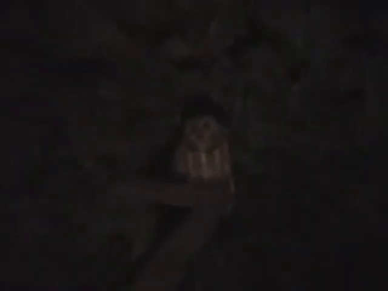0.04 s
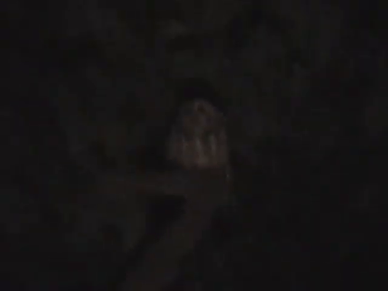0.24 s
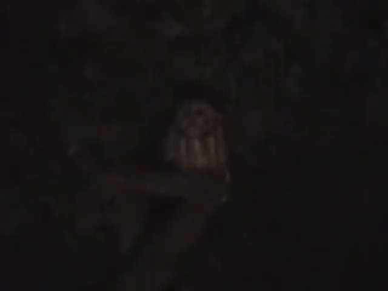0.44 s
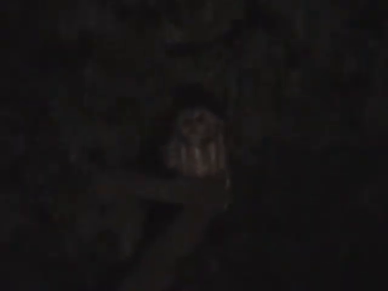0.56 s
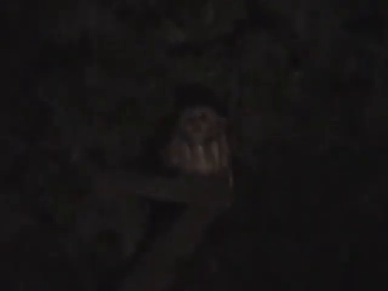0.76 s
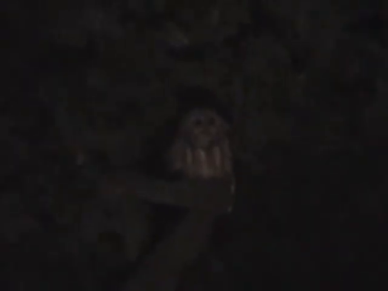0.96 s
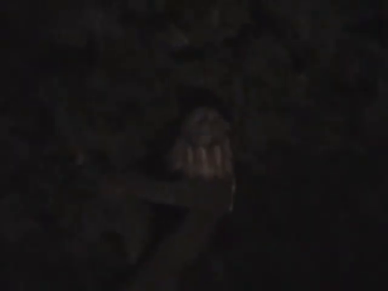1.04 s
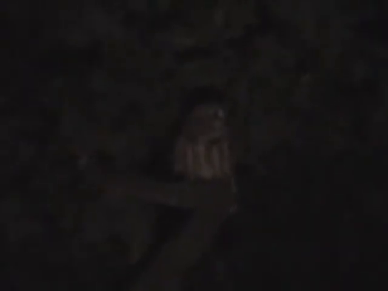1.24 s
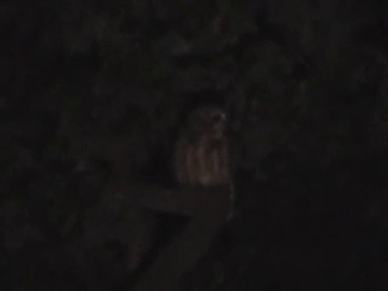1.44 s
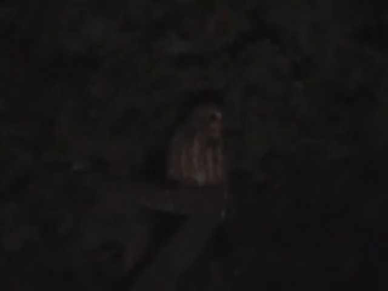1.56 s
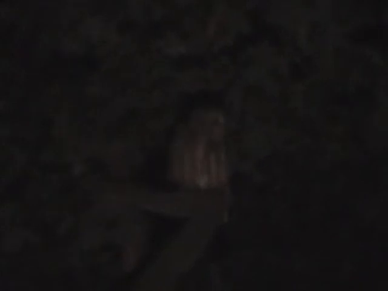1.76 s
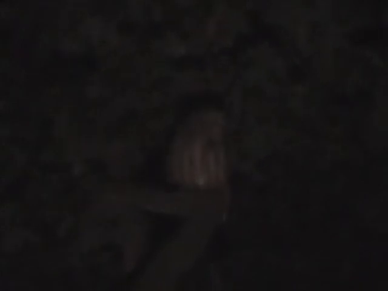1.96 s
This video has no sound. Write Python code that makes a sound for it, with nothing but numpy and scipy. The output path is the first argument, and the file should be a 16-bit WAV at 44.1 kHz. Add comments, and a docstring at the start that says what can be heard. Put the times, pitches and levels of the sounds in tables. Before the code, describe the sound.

An owl gives one loud, shrieking call at night, echoing slightly over faint hiss.

```python
"""Among trees at night, an owl on a perch gives one two-part call: a soft falling note, then a loud
arched shriek, its harmonics gliding through the fixed resonances of throat and beak. Ground and trunks
throw back a few echoes and a short tail. A small hollow knock follows close by, after a much fainter one,
and later a tiny rustle. Under it all lie faint night air and the hiss and ticking of a camera."""
import sys
import numpy as np
from scipy import signal
from scipy.fft import rfft, irfft, next_fast_len
from scipy.io import wavfile

SR = 44100
rng = np.random.default_rng(int(sys.argv[2]) if len(sys.argv) > 2 else 0)


def to_wav(sig):
    """Store sig (one row per channel, or 1-D mono) as 16-bit WAV at the path in sys.argv[1].

    Samples outside -1..1 are clipped; the rate is SR.
    """
    pcm = np.clip(np.atleast_2d(sig), -1, 1) * 32767
    pcm = np.round(pcm).astype(np.int16)
    wavfile.write(sys.argv[1], SR, pcm.T)  # frames by channels


N = 88200
LEAD = SR // 10  # samples of pre-roll: the call is already under way at time zero
TIME = np.arange(-LEAD, N) / SR
SIZE = len(TIME)
BINS_HZ = np.maximum(np.fft.rfftfreq(SIZE, 1 / SR), 1)


def from_db(db):
    """Decibels to gain."""
    return 10 ** (np.asarray(db) / 20)


def rms_one(x):
    """Scale to unit rms."""
    return x / np.sqrt(np.mean(x ** 2) + 1e-20)


def at_hz(curve, hz):
    """Read a curve on a log-frequency axis."""
    points_hz, values = np.transpose(curve)
    return np.interp(np.log(hz), np.log(points_hz), values)


def drift(hz):
    """Random wander up to the given rate, at unit rms."""
    lowpass = signal.butter(2, hz, fs=SR, output="sos")
    return rms_one(signal.sosfilt(lowpass, rng.standard_normal(SIZE + SR))[SR:])


def delayed(x, s):
    """The sound, s seconds later."""
    size = next_fast_len(len(x) + SR)
    shift = np.exp(-2j * np.pi * np.fft.rfftfreq(size, 1 / SR) * s)
    return irfft(rfft(x, size) * shift, size)[:len(x)]


def panned(x, pan_db, left_lag_s=0):
    """Mono to stereo by level and arrival time; a positive pan leans left."""
    return np.array([from_db(pan_db / 2) * delayed(x, left_lag_s), from_db(-pan_db / 2) * x])


def stereo(mid, side, correlation):
    """Blend two independent noises into a left-right pair of the given correlation."""
    return (np.sqrt(1 + correlation) * mid + np.sqrt(1 - correlation) * side * [[1], [-1]]) / np.sqrt(2)


def stereo_noise(size, correlation):
    """White noise, wider as the correlation drops."""
    return stereo(*rng.standard_normal((2, size)), correlation)


# Tone of the air and hiss. Each row: frequency in Hz, relative noise density in dB.
AIR_TONE = [(20, -21), (32, -26), (50, 0), (80, -3), (115, -8), (140, 0), (170, -10.5), (215, -0.5),
            (290, -10.5), (400, -3), (520, -5), (590, -10), (680, -7), (790, -8), (900, -12.5), (1030, -18),
            (1200, -13), (1400, -11.5), (2400, -15), (3400, -18.5), (3900, -17), (4750, -22), (5800, -21.5),
            (7500, -23), (9500, -24.5), (11200, -25), (13000, -24), (15500, -33.5)]
# Stereo image of that bed. Each row: frequency in Hz, left-right correlation.
AIR_CORRELATION = [(40, 0.93), (100, 0.66), (200, -0.12), (400, -0.27), (700, 0.005), (1500, -0.16),
                   (6000, 0.16), (10500, 0.283), (14000, 0.72)]
# Humming bands in the bed. Each row: centre in Hz, half-width in Hz, level in dB.
HUM_BANDS = [(1050, 37, -70.5), (656, 35, -72.5), (10920, 670, -77), (3850, 80, -85)]


def night_air():
    """A steady bed of distant rush and hiss, with a few narrow bands of humming noise."""
    mid, side = rfft(rng.standard_normal((2, SIZE)))
    spectrum = from_db(at_hz(AIR_TONE, BINS_HZ)) * stereo(mid, side, at_hz(AIR_CORRELATION, BINS_HZ))
    bed = from_db(-59.5) * rms_one(irfft(spectrum, SIZE))
    for centre, half_width, db in HUM_BANDS:
        band = rfft(stereo_noise(SIZE, correlation=.25)) / (1 + ((BINS_HZ - centre) / half_width) ** 2)
        bed += from_db(db) * rms_one(irfft(band, SIZE))
    return bed


# The call as heard through the trees, with level dips where reflections interfere. Each row: time in
# seconds, pitch in Hz, then levels in dB of the fundamental, second harmonic and overtones, before EQ.
CALL_THROUGH_TREES = [(-.06, 1403, -59, -46.5, -58.5), (-.003, 1359, -45, -46, -47),
                      (0.017, 1241, -64, -46.5, -64), (0.029, 1180, -58, -58.5, -53.5),
                      (.064, 1121, -54, -43.5, -63.5), (.078, 1019, -59, -56, -52.5),
                      (0.113, 1025, -56.5, -55.5, -48.5), (0.14, 965.6, -61.5, -61.5, -53.5),
                      (.166, 1004, -53, -55.5, -40.5), (0.183, 1134, -50.5, -42, -38.5),
                      (.2, 1110, -53, -44.5, -40), (0.211, 1252, -59, -37.5, -36.5),
                      (0.227, 1404, -48.5, -37, -37), (.258, 1546, -52, -31.5, -39.5),
                      (.276, 1648, -47.5, -31, -34.5), (.298, 1626, -47.5, -27, -32),
                      (.312, 1642, -38, -44.5, -32.5), (.325, 1617, -43, -30, -39),
                      (.333, 1613, -45, -39.5, -35), (.343, 1606, -45, -26, -34),
                      (0.361, 1473, -47, -32, -37), (0.375, 1382, -51, -32, -38.5),
                      (0.384, 1127, -62.5, -61.5, -64), (.4, 1113, -64, -57.5, -71)]
# Overtone balance. Each entry: offset from the overtone level in dB, from the third harmonic up.
OVERTONE_TRIMS = [-9.5, -16.5, -23, -24.5, -25.5, -29.5, -29]
# Resonances and valleys of throat and beak. Each row: frequency in Hz, gain in dB.
THROAT_EQ = [(950, -0.5), (1600, -2.5), (1850, 0), (2200, 0), (2600, -2), (3150, 0), (3380, 1.5),
             (3620, 2.5), (4000, -4), (4850, -3), (5250, -6.5), (5900, 4.5), (6600, -8.5), (7100, -5),
             (8200, -3.5), (9800, -8.5), (11400, -6.5), (14500, -18)]


def owl(top_note_hz=1659, breath_low_hz=4100):
    """A harmonic voice gliding through throat resonances, steadiest on top, with a rush of air."""
    times, notes_hz, *levels_db = np.transpose(CALL_THROUGH_TREES)
    glide = np.interp(TIME, times, notes_hz)
    octaves_down = np.clip(np.log2(top_note_hz / glide), 0, .25)
    jitter = .0014 + .037 * octaves_down
    pitch = glide * (1 + jitter * drift(hz=120))
    phase = 2 * np.pi * np.cumsum(pitch) / SR
    first_db, second_db, upper_db = (np.interp(TIME, times, db, right=-140) for db in levels_db)
    overtones_db = [upper_db + trim + 3.5 * drift(hz=70) for trim in OVERTONE_TRIMS]  # each wavers alone
    # Cycle-to-cycle unevenness in the glides frays the overtones.
    roughness = .36 * jitter / jitter.max() * drift(hz=500)
    voice = 0
    for k, db in enumerate([first_db, second_db] + overtones_db, 1):
        gain = np.sqrt(2) * from_db(db + at_hz(THROAT_EQ, k * pitch))
        voice += gain * np.sin(k * phase + max(k - 2, 0) * roughness)
    puffs = rng.standard_normal(SIZE) * (1 + np.cos(phase))  # one puff of air a cycle
    breath_tone = from_db(at_hz(THROAT_EQ, BINS_HZ) - 8 * np.log2(BINS_HZ / breath_low_hz))
    low_cut = 1 / (1 + (breath_low_hz / BINS_HZ) ** 6)
    breath = rms_one(irfft(rfft(puffs) * breath_tone * low_cut, SIZE))
    shimmer = from_db(.8 * drift(hz=120))
    return shimmer * (voice + from_db(upper_db - 25) * breath)


def trunk_scatter(x, paths, t60_s=.34):
    """Sound bouncing between near trunks: feedback delays spread over a range of round trips."""
    size = next_fast_len(len(x) + SR)
    hz = np.fft.rfftfreq(size, 1 / SR)
    response, power = 0, 0
    for k, trip_s in enumerate(np.geomspace(.0083, .058, paths)):
        feedback = from_db(-60 * trip_s / t60_s)
        loop = (-1) ** k * feedback * np.exp(-2j * np.pi * hz * trip_s)
        response += np.sqrt(trip_s) * loop / (1 - loop)
        power += trip_s * feedback ** 2 / (1 - feedback ** 2)
    return irfft(rfft(x, size) * response, size)[:len(x)] / np.sqrt(power)


def tree_reverb(x, tail_t60_s=.93, tail_rise_s=.028, leaves_cut_hz=13700):
    """Scatter from the near trees and a fainter, longer tail from the wood behind, softened by leaves."""
    mid, side = trunk_scatter(x, paths=17), trunk_scatter(x, paths=12)
    near = mid + from_db(-8) * side * [[1], [-1]]
    t = np.arange(SR) / SR
    envelope = from_db(-60 * t / tail_t60_s) * (1 - np.exp(-t / tail_rise_s))
    tail = envelope / np.linalg.norm(envelope) * stereo_noise(SR, correlation=.76)
    far = signal.fftconvolve(x[None], tail, axes=1)[:, :len(x)]
    leaves = signal.butter(1, leaves_cut_hz, fs=SR, output="sos")
    return signal.sosfilt(leaves, from_db(-5.5) * near + from_db(-15.5) * far)


# Slaps off ground and trunks. Each row: delay in seconds, gain in dB, pan in dB.
ECHO_TAPS = [(0.011, -7.5, 6), (.031, -10.5, -4), (.047, -13, -9), (0.12, -25, -16), (0.343, -36.5, -6)]


def echoes(x):
    """Single reflections, each later, quieter and from its own direction."""
    return sum(from_db(db) * panned(delayed(x, s), pan_db) for s, db, pan_db in ECHO_TAPS)


# The blips in one tick. Each row: offset in seconds, pitch in Hz, half-length in seconds,
# typical peak level in dB.
TICK_BLIPS = [(-.0046, 5900, 0.0012, -66), (-.0024, 3880, 0.00064, -65), (0.0, 5600, 0.00057, -59),
              (.0024, 4080, 0.00067, -65)]


def camera_ticks(first_s=.0191, period_s=.04, spread_db=2):
    """A faint cluster of high blips, 25 times a second, each a little different in level."""
    tick = np.round((TIME - first_s) / period_s).astype(int)
    t = TIME - first_s - tick * period_s
    ticks = 0
    for offset, hz, half_length, db in TICK_BLIPS:
        accent, phase = rng.standard_normal((2, 64))[:, tick]
        envelope = from_db(db + spread_db * accent) * np.exp(-((t - offset) / half_length) ** 2)
        ticks += envelope * np.sin(2 * np.pi * (hz * t + phase))
    return ticks


# A ghost hit, then the main knock. Each row: start in seconds, strike level in dB.
KNOCK_HITS = [(0.364, -60.5), (.522, -41.5)]
# Ring of the knocked object. Each row: pitch in Hz, gain in dB, time to fall 60 dB in seconds, pan in dB.
KNOCK_RING = [(404, -2.5, 0.032, -1), (544, 5.5, 0.035, 6.5), (730, 4.5, 0.043, 9.5),
              (1725, -4, 0.027, -12), (1914, -5, 0.027, -19), (2205, -7, 0.021, 15)]


def knocks(band_hz=(340, 2100)):
    """Small, dull, hollow knocks close by on the left: soft strikes ring a few short modes."""
    strikes = np.full(SIZE, 1e-18)
    for s, db in KNOCK_HITS:
        strikes[LEAD + int(s * SR)] = from_db(db)
    strikes = signal.sosfilt(signal.butter(4, band_hz, "band", fs=SR, output="sos"), strikes)
    body = 0
    for hz, db, t60, pan_db in KNOCK_RING:
        decay = from_db(-60 / (t60 * SR))
        angle = 2 * np.pi * hz / SR
        ring = signal.lfilter([.5, 0, -.5], [1, -2 * decay * np.cos(angle), decay ** 2], strikes)
        body += from_db(db) * panned(ring, pan_db, left_lag_s=.00032)
    return body


def rustle(peak_s=1.096, half_length_s=.009, low_cut_hz=2000):
    """A tiny, bright brush of noise."""
    highpass = signal.butter(2, low_cut_hz, "high", fs=SR, output="sos")
    brush = signal.sosfilt(highpass, stereo_noise(SIZE, correlation=.55))
    return from_db(-65) * np.exp(-((TIME - peak_s) / half_length_s) ** 2) * brush


def scene():
    """The mix: the owl a little to the right among its echoes, the knocks nearly dry, the bed beneath."""
    call, knock = owl(), knocks()
    owl_in_trees = panned(call, pan_db=-3.5) + tree_reverb(call) + echoes(call)
    close_knocks = knock + from_db(-13) * tree_reverb(knock.mean(axis=0))
    return (owl_in_trees + close_knocks + night_air() + camera_ticks() + rustle())[:, LEAD:]


def record(dry):
    """A steep high cut at 15.6 kHz across the mix."""
    return signal.sosfilt(signal.ellip(10, .1, 80, 15600, fs=SR, output="sos"), dry)


dry = scene()
out = record(dry)
to_wav(out)
```